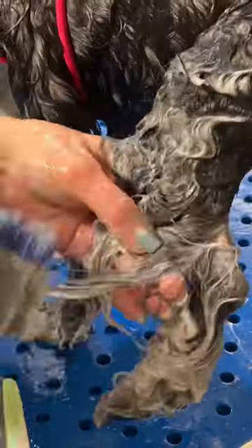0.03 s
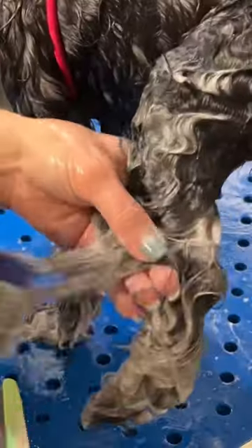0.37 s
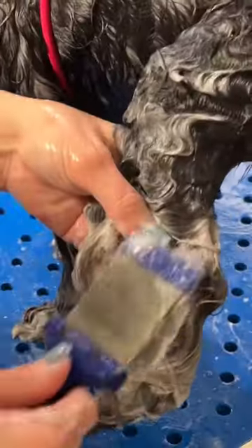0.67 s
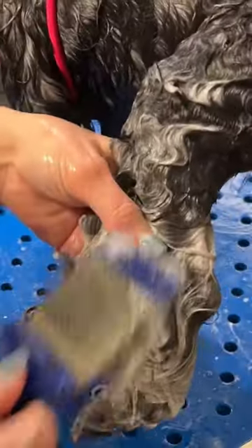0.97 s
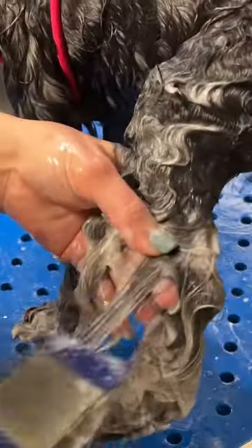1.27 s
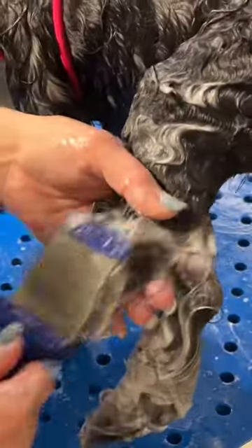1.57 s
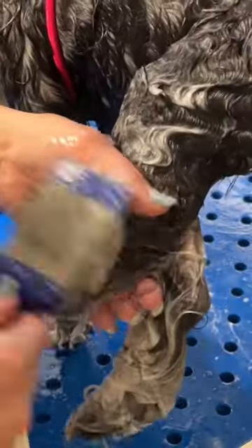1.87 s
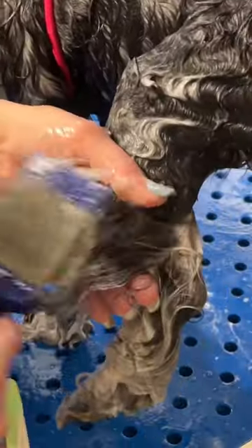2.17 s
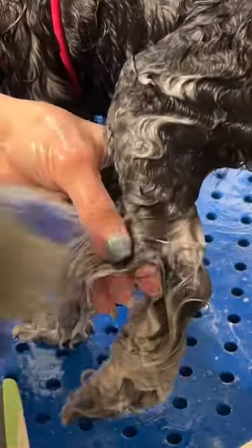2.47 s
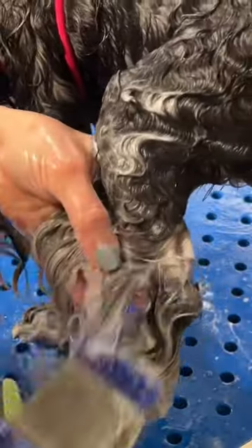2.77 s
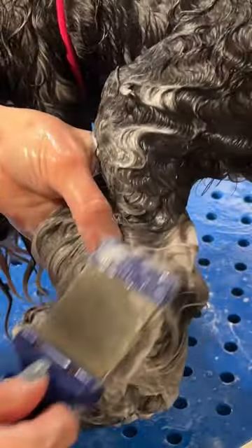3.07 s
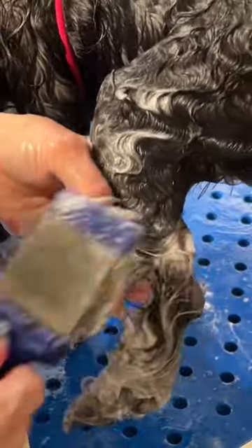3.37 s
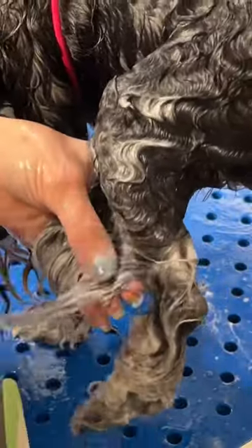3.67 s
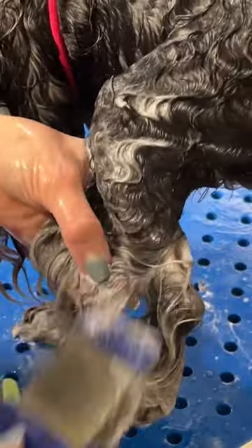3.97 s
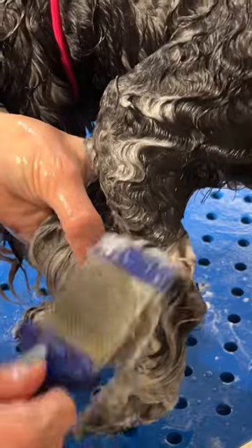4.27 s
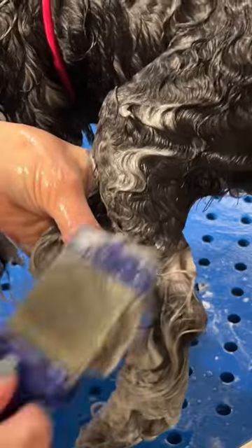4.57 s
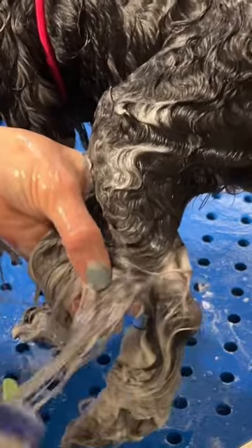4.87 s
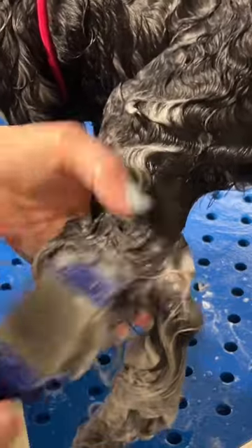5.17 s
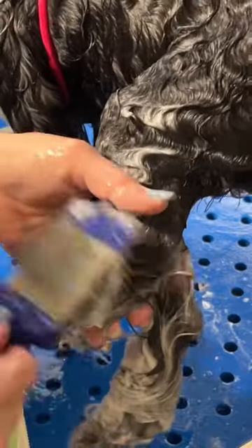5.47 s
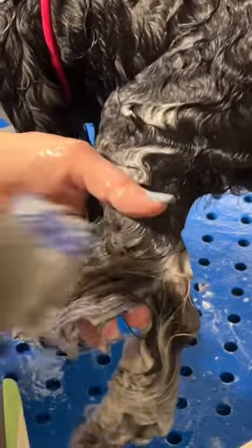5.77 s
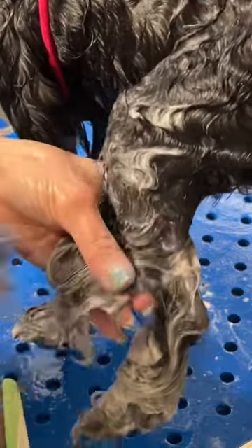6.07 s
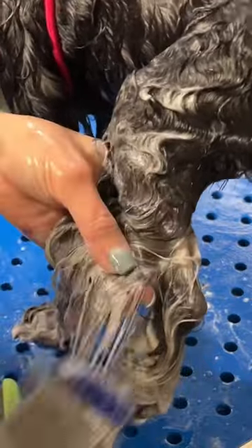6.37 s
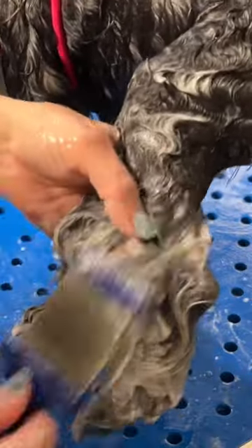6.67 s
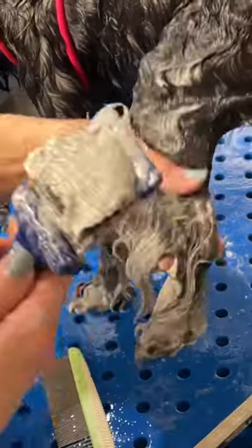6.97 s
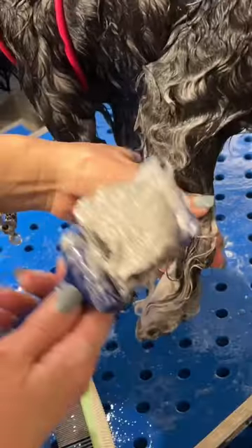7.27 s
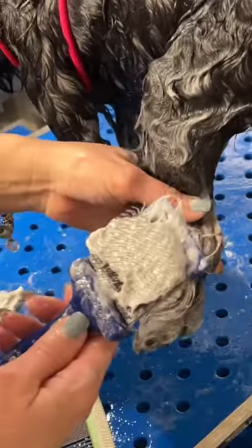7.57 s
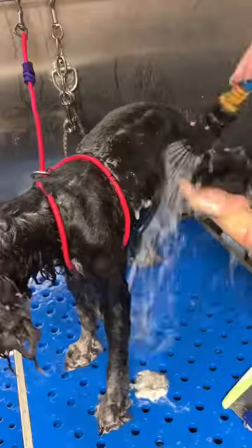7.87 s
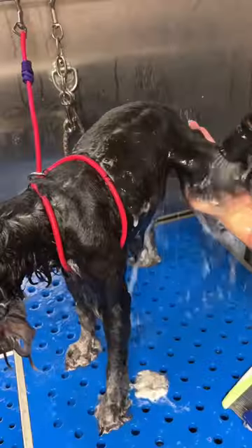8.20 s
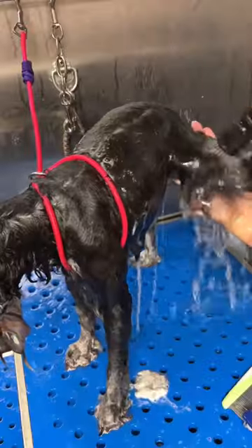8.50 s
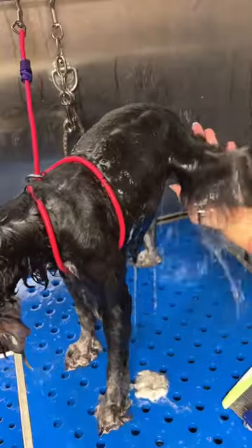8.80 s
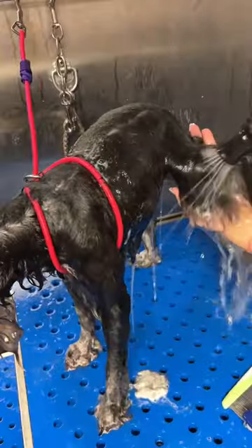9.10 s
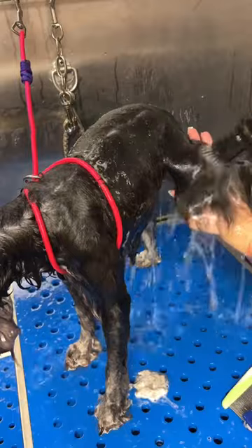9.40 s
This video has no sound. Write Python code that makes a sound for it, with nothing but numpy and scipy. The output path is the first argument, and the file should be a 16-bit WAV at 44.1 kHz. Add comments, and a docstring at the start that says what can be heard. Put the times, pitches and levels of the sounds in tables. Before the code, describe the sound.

Over the deep rumble of a grooming room, a close microphone picks up quick, even strokes of a wire brush scratching through wet dog fur, snagging tufts and wiping softly back. The brushing ends with a dry click. About a second later a much louder shower spray bursts on and keeps hissing, with drops splattering on the dog and drumming lightly on the steel tub.

```python
"""A wire slicker brush pulled through a dog's wet leg fur, in a rumbling grooming room, close to a phone's
stereo microphone. On each pull the pins snag hairs, snap free and ring on their rubber pad; between
pulls the brush wipes softly back. After a click and a second's rest a shower head sprays the dog in a
steel tub: the jets hiss, drops splash on the coat and the tub walls ring."""
import sys
import numpy as np
from scipy import signal
from scipy.fft import rfft, irfft, next_fast_len
from scipy.io import wavfile
from scipy.ndimage import uniform_filter1d

SR = 44100
rng = np.random.default_rng(int(sys.argv[2]) if len(sys.argv) > 2 else 0)


def dump(signal):
    """Clip the signal to [-1, 1] and save it as 16-bit WAV at the path in sys.argv[1]."""
    limited = np.clip(np.atleast_2d(signal).T, -1, 1)
    pcm = np.round(limited * 32767).astype(np.int16)
    wavfile.write(sys.argv[1], SR, pcm)


N = 420713
TIME = np.arange(N) / SR
BRUSH_STOP_S, SPRAY_ON_S = 6.8533, 7.843


def undb(db):
    """Decibels to gain."""
    return 10 ** (np.asarray(db) / 20)


def unit(x):
    """Scale to rms 1."""
    return x / np.sqrt(np.mean(x ** 2))


def colour(x, points):
    """Filter by a curve of (f/Hz, level/dB) points, falling 20 dB an octave beyond its ends."""
    size = next_fast_len(N + 4096, True)
    hz, db = np.transpose(points)
    octave = np.log2(np.maximum(np.arange(size // 2 + 1) * SR / size, 1))
    outside = np.maximum(np.log2(hz[0]) - octave, 0) + np.maximum(octave - np.log2(hz[-1]), 0)
    gain = undb(np.interp(octave, np.log2(hz), db) - 20 * outside)
    return irfft(rfft(x, size) * gain, size)[..., :N]


def ring(x, hz, width_hz):
    """One resonance, gain 1 at its centre."""
    return signal.lfilter(*signal.iirpeak(hz, hz / width_hz, fs=SR), x)


def walk(rate, size=N):
    """Random wander through `rate` points a second, spread near 1."""
    knots = rng.standard_normal(4096)
    return 1.2 * np.interp(TIME[:size] * rate, np.arange(len(knots)), knots)


def grains(rate, spread_db, size=N):
    """Tiny impacts of uneven size at random, about `rate` a second; mid and side, rms 1."""
    hit = rng.random(size) < rate / SR
    impacts = rng.standard_normal((2, size)) * hit
    return unit(impacts * undb(spread_db * np.minimum(rng.exponential(size=size), 4)))


def taps(table, relative_width, gain_db):
    """Short noise bursts through one broad resonance, with some unfiltered crack."""
    out, t = np.zeros((2, N + SR)), TIME[:SR // 4]
    for s, db, hz, t60, crack_db in table:
        burst = rng.standard_normal((2, len(t))) * undb(-60 * t / t60)
        width_hz = relative_width * hz
        tap = ring(ring(burst, hz, width_hz), hz, width_hz) + undb(crack_db) * burst
        start = int(s * SR)
        out[:, start:start + len(t)] += tap * undb(db + gain_db) / np.abs(tap).max()
    return out[:, :N]


# Room tone at the microphone: rumble during the work, rumble in the rest, air (f/Hz, relative level/dB)
BUSY_RUMBLE = [(15, -61), (25, -36), (30, -37), (39, -7.5), (65, 3.5), (79, -0.5), (102, -10.5), (136, -6),
               (167, -18.5), (193, -18), (225, -27), (316, -33), (560, -51), (730, -59.5), (1230, -120)]
REST_RUMBLE = [(15, -43), (25, -10), (43, -7), (61, -4), (86, -16.5), (118, -14.5), (136, -23.5),
               (426, -56), (492, -55), (560, -79), (730, -104), (1230, -120)]
AIR_HISS = [(290, -38), (500, -4), (843, -8.5), (1720, -12.5), (2500, -16.5), (3290, -16), (4210, -16),
            (16000, -33)]

def room():
    """The grooming room's deep rumble, duller during the rest, and faint air hiss."""
    resting = uniform_filter1d(1. * ((TIME > BRUSH_STOP_S) & (TIME < SPRAY_ON_S)), SR // 100)
    busy = unit(colour(rng.standard_normal((2, N)), BUSY_RUMBLE)) * undb(-36.5)
    calm = unit(colour(rng.standard_normal((2, N)), REST_RUMBLE)) * undb(-35.5)
    air = unit(colour(rng.standard_normal((2, N)), AIR_HISS)) * undb(-79)
    return busy * (1 - resting) + calm * resting + air


# Wet hair sliding under the brush, close up (f/Hz, relative level/dB)
WIPE_SPECTRUM = [(300, -11), (700, -3), (1150, -1.5), (1600, 2.5), (2200, 0.5), (3200, -1), (4500, -4),
                 (6300, -2), (8500, -4.5), (11000, -15), (16000, -20)]
# Return strokes over the coat (t/s, level/dB, relative treble/dB)
WIPE_STROKES = [(-.06, -67, 10), (.17, -63, -.5), (.597, -65.5, 0.5), (1.028, -61.5, -2), (1.47, -62.5, 0),
                (1.89, -66, 2.5), (2.2, -66, 1.5), (2.55, -61.5, -1.5), (2.98, -64, -1.5),
                (3.406, -63.5, -1), (3.795, -62, -1), (4.19, -62.5, -3), (4.599, -64.5, -2),
                (5.05, -63.5, 0.5), (5.475, -63, 1.5), (5.828, -65, 1), (6.18, -61.5, 0), (6.603, -62, 1),
                (7.256, -64.5, -7.5), (7.88, -71.5, 2)]

def wipes():
    """Soft swishes swell and fade with the speed of the hand; the treble needs speed, so is briefer."""
    body_half_s, treble_half_s, steepness = .089, .063, 2.4
    swish = unit(colour(grains(12000, spread_db=-2.5), WIPE_SPECTRUM))
    body = signal.sosfiltfilt(signal.butter(2, 2400, fs=SR, output="sos"), swish)
    speed, treble = np.zeros((2, N))
    for s, db, treble_db in WIPE_STROKES:
        near = np.abs(TIME - s) < 4 * body_half_s
        t = TIME[near] - s
        speed[near] += undb(db) * np.exp(-.5 * np.abs(t / body_half_s) ** steepness)
        treble[near] += undb(db + treble_db) * np.exp(-.5 * np.abs(t / treble_half_s) ** steepness)
    return body * speed + (swish - body) * treble


def plucked(modes, force, tension, rate, flutter_db):
    """Each mode is plucked by its own stream of snagging hairs and rings on after the force drops."""
    out, power = 0, 0
    for hz, width_hz, db in modes:
        gain = undb(db + 1.3 * rng.standard_normal())  # other pins take the load on each pull
        plucks = grains(rate, spread_db=2.5, size=len(force)) * force
        plucks *= undb(flutter_db * walk(45.5, size=len(force)))
        tone = ring(ring(plucks, hz * tension, width_hz), hz * tension, width_hz)
        out = out + gain * np.sqrt(2 * SR / (np.pi * width_hz)) * tone
        power += gain ** 2
    return out / np.sqrt(power)


# Hair sliding between the pins (f/Hz, relative level/dB)
RASP_SPECTRUM = [(300, -4), (700, -7), (1200, -2.5), (2200, -2), (4300, 1.5), (5200, -1.5), (6300, -1),
                 (8000, -2.5), (11000, -2.5), (13000, -8.5), (16000, -13)]
# Resonances of the wire pins and of their rubber pad (f/Hz, width/Hz, relative level/dB)
PIN_MODES = [(2312, 135, -1), (2664, 170, 1), (2903, 116, -1.5), (3234, 260, 3), (3632, 110, 0.5),
             (3875, 260, -3.5)]
PAD_MODES = [(1058, 58, -11.5), (1560, 150, 0), (1903, 280, 6), (2070, 170, 8)]
# Pulls and short second tugs on the leg, close to the microphone
# (t/s of full bite, attack/s, hold/s, release/s, rasp/dB, pins/dB, pad/dB, pitch ratio from the load)
PULL_STROKES = [(0.286, 0.014, 0.035, 0.15, -53, -50, -55, 1),
                (0.724, 0.017, 0.023, 0.16, -52.5, -49, -64, 0.97),
                (1.169, .035, 0.024, 0.15, -49.5, -44.5, -67, .98),
                (1.598, 0.046, 0.049, 0.13, -53, -50.5, -61, 0.94),
                (1.954, 0.027, 0.019, 0.17, -52, -49, -49, 0.95),
                (2.253, .028, 0.026, 0.16, -54.5, -52.5, -51.5, 0.98),
                (2.69, 0.037, .032, 0.15, -49.5, -48.5, -61, .97),
                (3.108, 0.025, .034, 0.19, -49.5, -44, -53, .96),
                (3.492, 0.035, 0.04, .13, -52.5, -48.5, -57.5, 0.97),
                (3.916, 0.036, 0.041, .15, -50, -50, -64, 1.04),
                (4.333, 0.033, 0.027, .13, -48, -45, -58, 1.03),
                (4.706, 0.017, .02, 0.21, -47.5, -41.5, -53, 1.05),
                (4.815, 0.016, .004, 0.07, -54, -45, -69, 1.02),
                (5.172, 0.045, 0.026, .17, -50, -43.5, -57, 0.98),
                (5.553, 0.014, 0.038, 0.13, -49, -45.5, -58, .97),
                (5.893, .013, 0.041, 0.14, -52, -50, -55, .95),
                (6.254, 0.015, 0.015, .06, -50.5, -47.5, -52, 0.94),
                (6.307, 0.022, 0.0071, 0.17, -54, -56.5, -62, 1.06),
                (6.684, 0.018, .014, 0.15, -45.5, -40, -53, .97)]

def pulls():
    """Pins graze, bite, hold and slide out of the fur: hairs rasp, the wires ring, the pad flexes."""
    graze_half_s, attack_rise_db, release_fall_db = .03, 20, 30
    pin_relax_db_per_s, pad_relax_db_per_s = 34, 121  # once the first tangle gives way
    out = np.zeros((2, N))
    rasp = unit(colour(grains(12000, spread_db=-2.0), RASP_SPECTRUM))
    for s, attack_s, hold_s, release_s, rasp_db, pin_db, pad_db, tension in PULL_STROKES:
        span = (TIME > s - 4 * graze_half_s) & (TIME < s + hold_s + 2 * release_s)
        t = TIME[span] - s
        age = np.maximum(t, 0)
        graze_db = -17 - 2 * (t / graze_half_s) ** 2
        rise_db = np.maximum(attack_rise_db * np.minimum(t, 0) / attack_s, graze_db)
        fall_db = release_fall_db * (np.maximum(t - hold_s, 0) / release_s) ** 1.007
        tangles_db = .82 * walk(56.5, size=len(t))
        force_db = rise_db - fall_db + tangles_db
        pin_force = undb(pin_db + 1.22 * force_db - pin_relax_db_per_s * age)
        pad_force = undb(pad_db + 1.17 * force_db - pad_relax_db_per_s * age)
        hairs = rasp[:, span] * undb(rasp_db + force_db)
        wires = plucked(PIN_MODES, pin_force, tension, rate=2000, flutter_db=1.0)
        freed_pins = undb(-6) * ring(wires, hz=3584, width_hz=35)
        pad = plucked(PAD_MODES, pad_force, tension, rate=1800, flutter_db=.5)
        out[:, span] += hairs + wires + freed_pins + pad
    return out


# Tufts letting go (t/s, relative peak level/dB, f/Hz, t60/s, relative crack/dB)
TUFT_SNAPS = [(.2379, -36, 3450, 0.14, -13.5), (.2897, -39.5, 1890, 0.05, -29),
              (1.0969, -49.5, 4850, 0.12, -14), (1.1338, -47.5, 2770, 0.073, -21),
              (1.5155, -51.5, 2500, 0.21, -18), (1.954, -46, 1860, 0.11, -29),
              (2.0356, -45.5, 3130, 0.11, -12), (2.2335, -45, 1770, 0.068, -28),
              (2.6409, -46, 1610, 0.33, 1), (3.2194, -54, 3580, 0.058, -26),
              (3.492, -43.5, 1900, 0.12, -27), (4.2567, -56, 5000, 0.22, -8),
              (4.6424, -48.5, 6000, 0.12, -5), (5.9665, -38.5, 2620, 0.12, -13),
              (6.5824, -40, 2650, 0.025, -39)]

def snaps():
    """Single tufts snap off the pins."""
    return taps(TUFT_SNAPS, relative_width=.44, gain_db=1.5)


# Knocks on the leg (t/s, relative peak level/dB, f/Hz, t60/s, relative crack/dB)
LEG_BUMPS = [(2.609, -39.5, 800, 0.073, -23), (2.632, -38.5, 467, 0.15, -20),
             (2.685, -44.5, 320, 0.55, -37)]

def bumps():
    """The brush bumps dully against the leg."""
    return taps(LEG_BUMPS, relative_width=1.05, gain_db=-2.0)


def click():
    """One dry click, left of centre, as the scene changes and the brushing stops."""
    age, decay_s = TIME - BRUSH_STOP_S, .002
    return undb(-33) * (age > 0) * np.exp(-np.abs(age) / decay_s) * np.array([[1], [.3]])


def flicker(x, depth_db, rate):
    """Neighbouring bands swell and sink on their own as the jets wander over the coat."""
    out, below = 0, 0
    for hz in np.geomspace(2000, 14000, 9):
        low = signal.sosfiltfilt(signal.butter(4, hz, fs=SR, output="sos"), x)
        out = out + (low - below) * undb(depth_db * walk(rate))
        below = low
    return out + x - below


# The shower's fine jets, and their splash on coat and tub (f/Hz, relative level/dB)
JET_SPECTRUM = [(2500, -17), (4000, -4), (5000, -5), (6200, -0.5), (7500, -0.5), (9800, -4.5), (11300, -2),
                (13000, -5.5), (16000, -8)]
SPLASH_SPECTRUM = [(90, -35), (160, 13), (240, 4.5), (400, 5), (700, -2), (1200, -3.5), (2200, -1.5),
                   (3600, -4.5), (5000, -9.5), (8000, -14), (16000, -42)]

def spray(valve):
    """Fine jets surge and settle to a slowly fading hiss, over a dense splash of drops."""
    age = np.maximum(TIME - SPRAY_ON_S, 0)
    surge_db = 6.5 * np.exp(-age / .08)  # stored pressure escapes as the valve opens
    sway_db = .1 * walk(11)  # the hand moves the jets about
    flow_db = surge_db + sway_db - .14 * age
    jets = unit(colour(grains(20000, spread_db=-4.5), JET_SPECTRUM)) * undb(-38.5 + flow_db)
    splash = unit(colour(grains(4500, spread_db=2.0), SPLASH_SPECTRUM))
    splash *= undb(-43 + .5 * flow_db + .29 * walk(60))
    return valve * flicker(jets + splash, depth_db=2.0, rate=22)


# Resonances of the steel tub around the dog (f/Hz, relative level/dB)
TUB_MODES = [(315, 2), (356, 0.5), (469, 0.5), (532, -4), (610, 0.5), (660, 0), (729, -3.5), (889, -2),
             (973, 1), (1077, 2.5), (1103, -6.5), (1181, -17), (1432, -0.5), (1545, -13)]

def tub(valve):
    """Drops drum on the steel walls and set them ringing."""
    drops = grains(5000, spread_db=0.0) * valve * np.array([[1], [.6]])
    walls = sum(undb(db) * ring(drops, hz, width_hz=16.6) for hz, db in TUB_MODES)
    return unit(walls) * undb(-54)


# The larger splats on the coat (t/s, relative peak level/dB, f/Hz, t60/s, relative crack/dB)
COAT_SPLATS = [(7.856, -36.5, 1820, 0.065, -21), (7.866, -23, 6100, .066, -6),
               (7.938, -24.5, 4580, 0.11, -6), (8.172, -28, 3000, 0.17, -9.5),
               (8.345, -27.5, 6250, 0.17, 0), (8.626, -25, 7900, 0.064, -9), (8.684, -23.5, 3700, .05, -4),
               (8.768, -30, 5850, 0.15, -18), (8.806, -29.5, 2470, .11, -15.5),
               (8.844, -25, 3500, 0.052, -10), (8.934, -23.5, 6400, 0.057, -22),
               (9.014, -27.5, 9300, 0.097, -15), (9.238, -25.5, 6500, 0.14, -8),
               (9.33, -27.5, 6200, 0.15, -10), (9.362, -28.5, 3300, 0.26, -2),
               (9.398, -30, 2860, 0.18, -19), (9.402, -27.5, 5030, .1, -20), (9.503, -30, 3060, 0.2, -12),
               (9.523, -24.5, 6200, .08, -13)]

def splats(small_count=60):
    """Jets hit pockets of water in the coat, each with its own pitch; small splats fall at random."""
    small = []
    for when, size, pitch in rng.random((small_count, 3)):
        s = SPRAY_ON_S + when * (TIME[-1] - SPRAY_ON_S)
        small.append((s, -42 + 7 * size + 6 * pitch, 2600 * 4.5 ** pitch, .06, -12))
    return taps([*COAT_SPLATS, *small], relative_width=.34, gain_db=3.0)


# Diffuse sound differs between the two microphone ports (f/Hz, side level/dB)
DIFFUSE_WIDTH = [(60, -27), (150, -22), (250, -14), (450, -1.5), (750, 1.5), (1200, -2.5), (1800, -14.5),
                 (2600, -2), (3800, -4.5), (5000, -3), (10000, -3), (16000, -0.5)]
# The low mids lean to the left (f/Hz, side level re mid/dB)
LEFT_LEAN = [(60, -45), (130, -23.5), (250, -21.5), (700, -17), (1300, -28), (2000, -51)]
# Treble reaches the right port first (f/Hz, pressure gradient level/dB)
RIGHT_LEAD = [(1000, -49.5), (4200, -15), (6000, -13), (10000, -5.5), (16000, -8)]

def scene():
    """Room, brush and shower as mid and side, picked up left and right by two close microphone ports."""
    valve = np.clip((TIME - SPRAY_ON_S) / .0044, 0, 1)
    brushing = wipes() + pulls() + snaps() + bumps() + click()
    mid, side = room() + brushing + spray(valve) + tub(valve) + splats()
    side = colour(side, DIFFUSE_WIDTH) + colour(mid, LEFT_LEAN) - colour(np.gradient(mid), RIGHT_LEAD)
    return np.array([mid + side, mid - side])


def record(dry):
    """The phone cuts the bass below 30 Hz and the top above 15.9 kHz."""
    dry = signal.sosfilt(signal.butter(3, 30, "high", fs=SR, output="sos"), dry)
    return signal.sosfilt(signal.ellip(10, .2, 70, 15900, fs=SR, output="sos"), dry)


dry = scene()
out = record(dry)
dump(out)
```